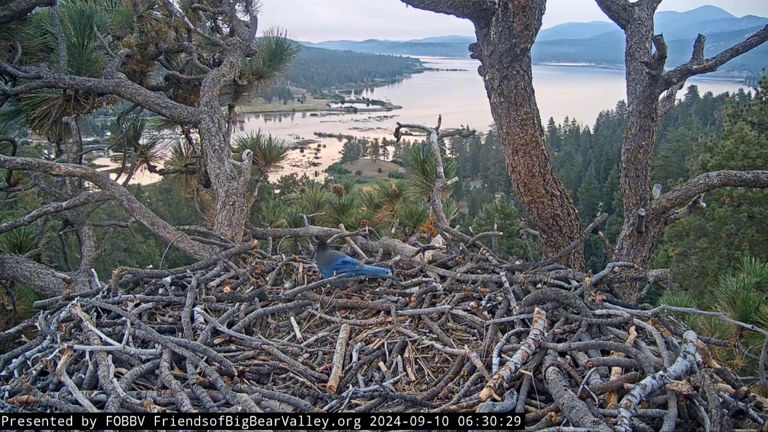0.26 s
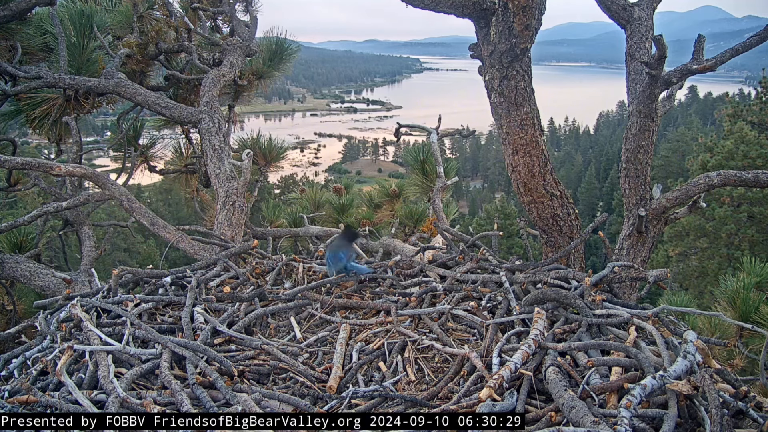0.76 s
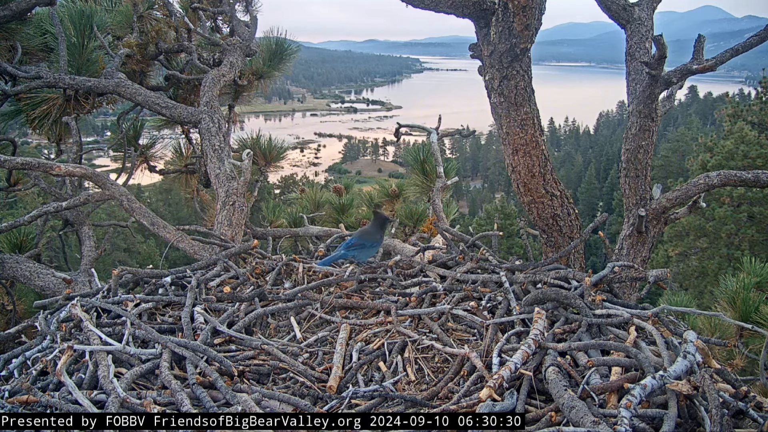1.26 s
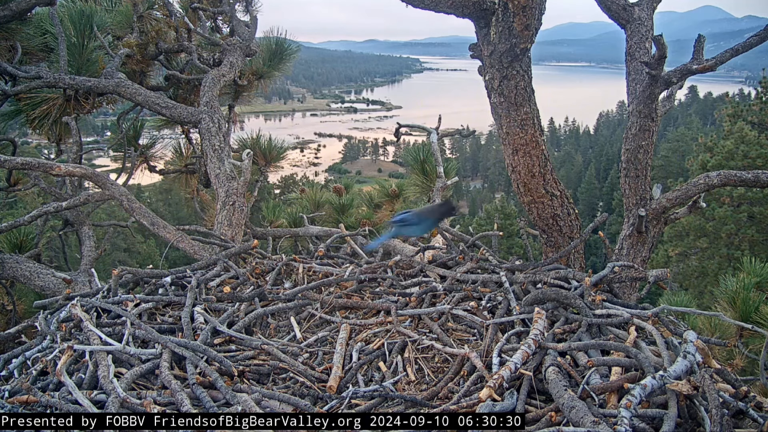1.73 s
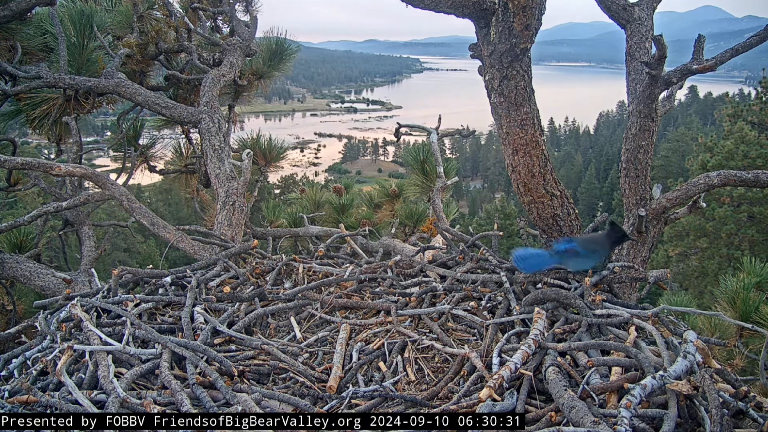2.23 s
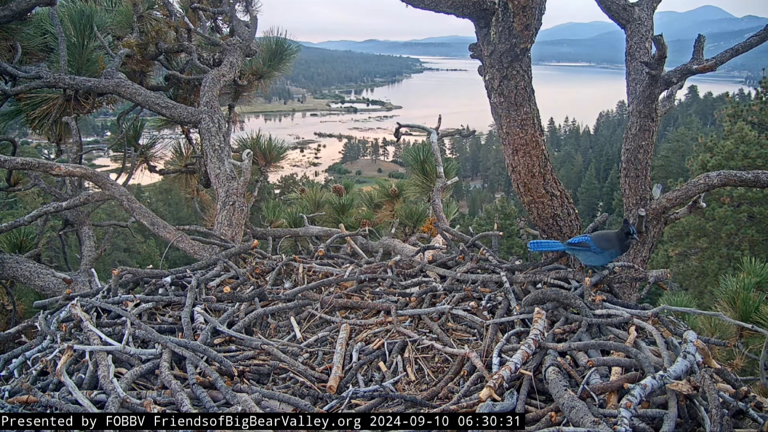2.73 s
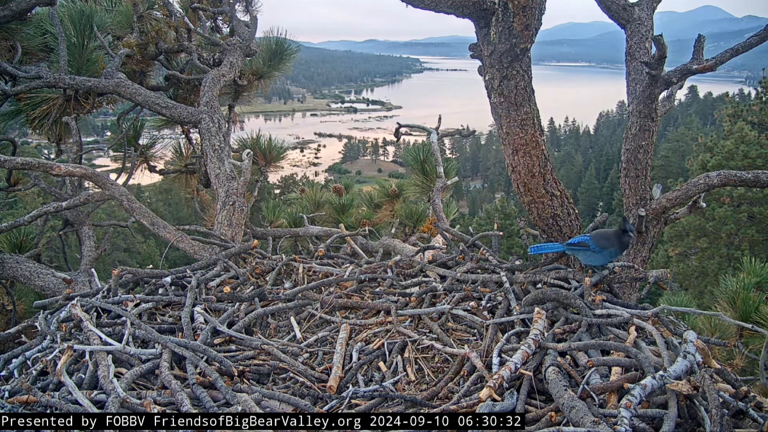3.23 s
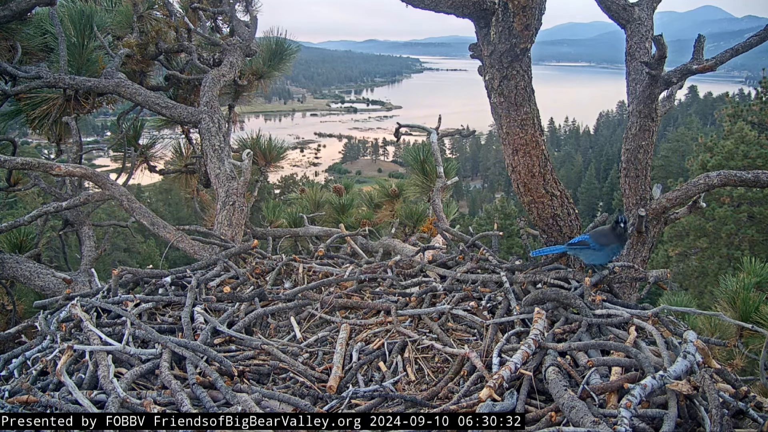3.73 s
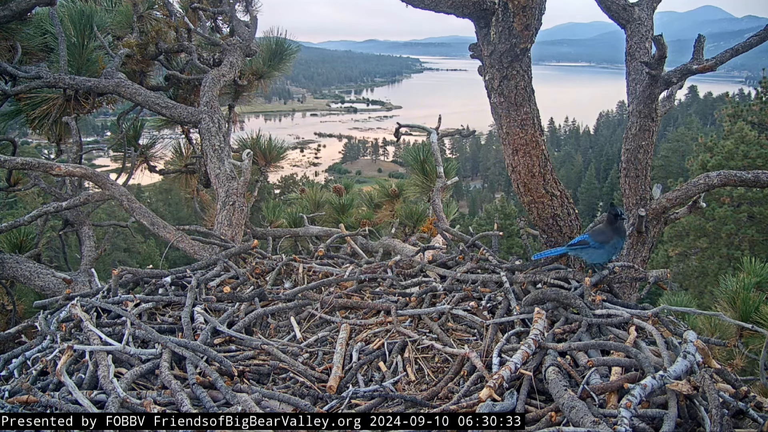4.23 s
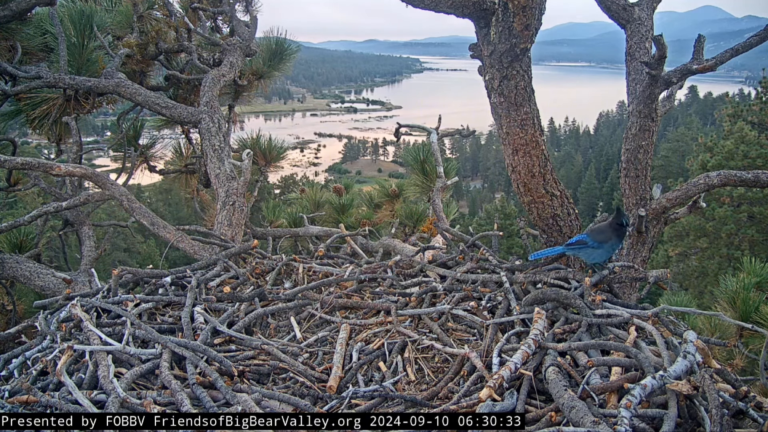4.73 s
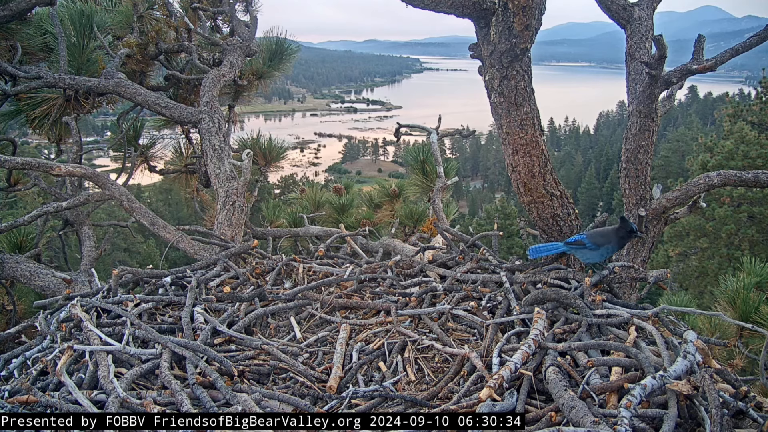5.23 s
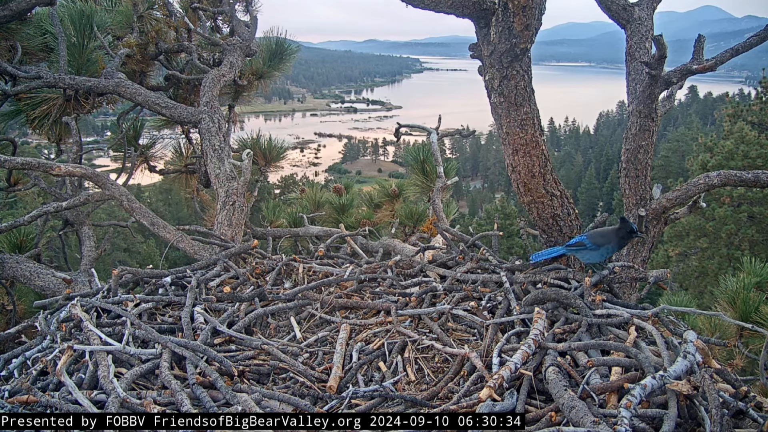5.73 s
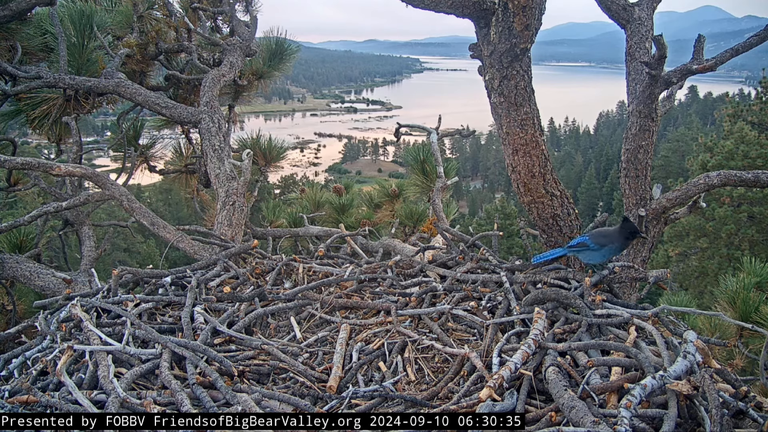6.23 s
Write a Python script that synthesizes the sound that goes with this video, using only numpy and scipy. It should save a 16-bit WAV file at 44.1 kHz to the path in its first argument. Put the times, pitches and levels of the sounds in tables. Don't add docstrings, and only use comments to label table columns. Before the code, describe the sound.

A close jay fires two rapid bursts of harsh, overdriven calls, a distant jay answering between them, over faint engine drone and small-bird chatter.

```python
import sys
import numpy as np
from scipy import signal
from scipy.fft import rfft, irfft, next_fast_len
from scipy.io import wavfile
from scipy.ndimage import uniform_filter1d, map_coordinates

SR = 44100
rng = np.random.default_rng(int(sys.argv[2]) if len(sys.argv) > 2 else 0)


def nominal_scale(level):
    x = np.asarray(level, float) / 20
    return 10 ** x


def wrap_up_sound(samples):
    columns = np.atleast_2d(samples).T
    tamed = np.clip(columns, -1, 1)
    steps = np.round(tamed * 32767).astype(np.int16)
    wavfile.write(sys.argv[1], SR, steps)


N = 286209
MS = np.arange(-441, 3300) / SR * 1000

# frequency in Hz, time to fall by 60 dB in seconds.
TREES = [(500, 1), (1900, 0.53), (4600, 0.58), (12000, 0.59)]
# frequency in Hz, level in dB.
FRONT = [(60, -20.5), (300, -7), (900, -15), (1500, -7), (3500, -1), (5300, 0), (9000, -3.5), (13500, -9.5),
         (14600, -10.5), (15700, -39.5)]


def unit(x):
    return x / np.sqrt(np.mean(x ** 2) + 1e-20)


def along(points, hz):
    f, v = np.transpose(points)
    return np.interp(np.log(hz + 1), np.log(f + 1), v)


def curves(rows):
    s, *cols = np.transpose(rows)
    return [np.interp(np.arange(N) / SR, s, c) for c in cols]


def wobble(rate, size=N):
    return map_coordinates(rng.standard_normal(size // 30 + 4), [np.arange(size) * rate / SR])


def coloured(x, spectrum):
    m = next_fast_len(len(x))
    points = [(0.64, -120)] + spectrum + [(SR / 2, -120)]
    gain = nominal_scale(along(points, np.fft.rfftfreq(m, 1 / SR)))
    return unit(irfft(rfft(x, m) * gain, m)[:len(x)])


def cycle(hz):
    return 2 * np.pi * (np.cumsum(hz) / SR + rng.random())


def echoes(x, t60s):
    # frequency in Hz, level in dB.
    echo_colour = [(500, -4), (1100, 1.5), (1850, 0.5), (2600, -3.5), (3700, 1), (4600, 3), (6000, -7.5),
                   (14000, 1.5)]
    hz, t, z = signal.stft(rng.standard_normal(SR // 2), SR, nperseg=128)
    fade_db = along(echo_colour, hz)[:, None] - 60 * t / along(t60s, hz)[:, None]
    tail = signal.istft(z * nominal_scale(fade_db), SR, nperseg=128)[1]
    return signal.fftconvolve(x, tail / np.linalg.norm(tail))


def hiss():
    # time in seconds, level in dB.
    hiss_level = [(0, -55.5), (1.3, -56), (1.7, -57.5), (2.8, -62), (4.9, -61.5), (5.9, -61.5),
                  (6.49, -62.5)]
    # frequency in Hz, density in dB per Hz.
    hiss_colour = [(400, 9.5), (850, 10.5), (1400, 6), (1950, 9.5), (2700, -3), (3700, 13), (4500, -1),
                   (6000, 12), (9000, 4), (13300, -2), (14000, 2), (14700, -42)]
    (hiss_db,) = curves(hiss_level)
    return nominal_scale(hiss_db) * coloured(rng.standard_normal(N), hiss_colour)


def engine():
    # time in seconds, level in dB, pitch the valley booms at in Hz, engine load in dB.
    drone = [(0.0, -33, 100, 0.5), (0.15, -34.5, 105, 3.5), (0.47, -34, 98, -8), (0.65, -38.5, 129, -6.5),
             (1.16, -35, 136, -9), (1.48, -39, 117, -9.5), (1.63, -39.5, 97.5, -13),
             (1.82, -46.5, 128, -8.5), (2.45, -46.5, 131, -5.5), (2.73, -41.5, 114, -10.5),
             (3.14, -42.5, 116.6, -7), (3.85, -38, 105, -19), (4.27, -40.5, 101, -6),
             (4.75, -43.5, 129, -4.5), (5.02, -47, 119, 1.5), (5.58, -49.5, 128, -5),
             (6.04, -35.5, 106, -6), (6.49, -33, 106.3, -8)]
    # time in seconds, firings a second in Hz, steadiness from 0 to 1.
    firing = [(0, 29, .98), (.4, 29.1, .96), (.65, 28.8, .86), (.9, 28.4, .84), (1.3, 27.9, .84),
              (1.7, 27.6, .8), (2.6, 26.5, .3), (3.7, 25, .25), (4.1, 25.4, .9), (4.5, 25.6, .97),
              (4.95, 26, .97), (5.8, 26.6, .97), (6.15, 27.05, .98), (6.49, 27.6, .98)]
    # level in dB, from order 2 to 24.
    order_levels = [0, 2, 2, 1, -5.5, 0, 1.5, 0, 1, -5, 3, 1.5, 1.5, 0.5, -4, 4, -3, -2, 3, -0.5, 3, 0, -2]
    # time in seconds, centre in Hz, depth in dB.
    ground = [(0, 199, -8), (.5, 200, -5), (1.5, 300, -2), (4.3, 290, -12), (4.6, 290, -9.5),
              (4.85, 253, -9), (5.8, 202, -7), (6.49, 195, -8)]
    # frequency in Hz, level in dB.
    pipe = [
        [(45, -75), (62, -44), (81, -15), (105, 0), (122, -3), (135, -30)],
        [(115, -40), (128, 0), (155, -3), (170, -30)],
        [(150, -40), (178, 3), (205, -4), (310, -5), (345, -20)],
        [(290, -30), (345, 0), (445, -1), (475, -19), (620, -22), (720, -38)],
    ]
    # share of the level, share of the load, offset in dB.
    load_rows = [
        (0.453, 0.558, -22),
        (0.999, 1.05, -1.5),
    ]
    blur = [1, 1, 4, 5]
    # frequency in Hz, level in dB.
    wash = [(440, -23), (500, 2), (630, -3.5), (720, -19), (850, -16.5)]

    hz, steady = curves(firing)
    turn = cycle(hz)
    dip_hz, dip_db = curves(ground)
    orders = np.zeros(N)
    for k, db in enumerate(order_levels, 2):
        octaves_off = np.log2(k * hz / dip_hz)
        ground_db = dip_db * np.exp(-(octaves_off / 0.16) ** 2)
        orders += nominal_scale(db + ground_db + 3 * wobble(2.2)) * np.sin(k * turn + 6.3 * rng.random())

    level_db, boom_hz, load_db = curves(drone)
    lows = [level_db - 37.5 * np.log2(boom_hz / centre_hz) ** 2 for centre_hz in (109, 137.7)]
    highs = [loud * level_db + share * load_db + db for loud, share, db in load_rows]
    out = nominal_scale(-68.5) * coloured(rng.standard_normal(N), [(20, -17.0), (50, -6.0), (70, 7.0), (90, -29.0)])
    for db, band, power in zip(lows + highs, pipe, blur):
        clear = steady ** power
        tones = np.sqrt(clear) * coloured(orders, band)
        rumble = np.sqrt(1 - clear) * coloured(rng.standard_normal(N), band)
        out += nominal_scale(db - 2.0) * (tones + rumble)
    return out + nominal_scale(highs[-1] - 17) * coloured(rng.standard_normal(N), wash)


def chatter():
    # time in seconds, level in dB.
    flock = [(0.0, -46), (0.38, -46), (0.65, -47.5), (1.16, -49), (1.3, -39), (1.5, -46), (1.75, -42),
             (2.3, -47.5), (2.96, -44.5), (3.31, -54), (3.78, -53.5), (3.98, -44.5), (4.5, -43),
             (4.78, -51.5), (5.0, -54.5), (5.2, -48), (5.75, -46.5), (6.49, -50.5)]
    # frequency in Hz, density in dB per Hz.
    voices = [
        [(900, -34.5), (1300, -18.5), (1550, -11), (1900, -2), (2400, -12.5), (3050, -13.5), (3700, -26),
         (4200, -48.5)],
        [(3300, -46), (3800, -5.5), (4400, 1.5), (5300, -2.5), (6000, -24), (7500, -37.5)],
    ]
    # time in seconds, length in seconds, lift of low voices in dB, of high in dB.
    syllables = [(.008, 0.024, 7, 5), (.16, 0.022, 6, 5), (0.232, 0.026, 3, 10.5), (0.335, 0.12, 7.5, 6.5),
                 (0.445, 0.044, 4, 2.5), (0.507, 0.016, -2, 4), (0.583, 0.027, 4.5, 6),
                 (0.65, 0.031, 3, 4.5), (0.844, 0.12, 1.5, 6.5), (1.037, 0.031, 6.5, -1),
                 (1.085, 0.044, 3, 4.5), (1.2, 0.076, 4.5, 6), (1.3, 0.028, -2, 5)]

    t = np.arange(N) / SR
    (low_db,) = curves(flock)
    high_db = low_db - 5 - 0.5 * t
    lift = sum(np.outer(pair, np.exp(-(2 * (t - s) / length) ** 4)) for s, length, *pair in syllables)
    shared = wobble(35)
    out = np.zeros(N)
    for db, spectrum in zip([low_db, high_db] + lift, voices):
        z = signal.stft(rng.standard_normal(N), nperseg=512)[2]
        field = uniform_filter1d(rng.standard_normal(z.shape), size=3, axis=0)
        field = uniform_filter1d(field, size=6, axis=1)
        patches = signal.istft(z * nominal_scale(3 * unit(field)), nperseg=512)[1][:N]
        out += nominal_scale(db + 1.2 * shared) * coloured(patches, spectrum)
    return out


def songbirds():
    # start in seconds, length in seconds, middle pitch in Hz, glide in Hz,
    # level in dB.
    arches = [(-.055, .13, 7000, -500, -56), (0.249, 0.12, 1758, 140, -39), (0.284, 0.07, 6160, -100, -57),
              (.26, .11, 5120, 150, -52), (0.385, 0.09, 6750, -700, -57), (3.5, 0.086, 1414, -150, -62.5),
              (3.78, 0.093, 2800, -280, -60), (3.78, 0.062, 1383, -74, -60)]
    glides = [(0.152, 0.023, 2000, 79, -37), (0.14, 0.029, 4360, 199, -50),
              (1.19, 0.047, 5500, -300, -52.5), (0.262, 0.063, 3480, 158, -48.5),
              (0.295, 0.081, 2830, -200, -52), (0.335, 0.054, 1730, 345, -39), (.53, 0.075, 5260, -40, -53),
              (0.685, 0.043, 996, -66, -59), (0.824, 0.11, 1765, 72, -45), (0.855, 0.058, 2620, -710, -54),
              (1.027, 0.024, 1800, -170, -38.5), (1.071, 0.0086, 2300, -600, -51),
              (1.09, .009, 2200, -700, -49), (.005, 0.011, 2300, -1000, -47), (.226, .02, 2050, 0, -45),
              (1.215, .06, 3000, 498, -58), (1.184, 0.049, 1767, -150, -40.5),
              (1.24, 0.032, 1850, -500, -43.5), (1.286, 0.055, 1640, 57, -42),
              (1.287, 0.14, 2800, -100, -44.5), (3.52, 0.038, 2810, -300, -58.5),
              (3.53, 0.042, 1900, -400, -53), (3.82, 0.04, 2950, -350, -60), (5.88, 0.28, 3000, -30, -60),
              (6.015, 0.02, 5280, -500, -51.5), (6.017, 0.018, 4330, -500, -51),
              (3.767, 0.11, 1750, -150, -56.5), (5.102, 0.0072, 1830, 27, -31),
              (5.243, 0.0055, 1820, -2, -37), (5.383, .006, 1800, 0, -32), (2.141, 0.004, 1820, -2, -39),
              (5.854, 0.015, 944, -20, -57)]
    dips = [
        (4.23, 0.16, 1588, 77, -45),
        (4.305, 0.057, 2687, 140, -48),
    ]

    out = np.zeros(N + SR)
    early = SR // 10
    for rows, bend in [(arches, -0.13), (glides, -0.0458), (dips, 0.0624)]:
        for s, length, middle, glide, db in rows:
            u = np.linspace(-1, 1, round(length * SR))
            hz = middle * (1 + bend * u ** 2) + glide / 2 * u
            hz = hz * (1 + 0.016 * wobble(190, len(u)))
            swell_db = 5 + 5.5 * np.tanh(wobble(64.8, len(u)))
            note = nominal_scale(db + swell_db) * (1 - u ** 4) * np.sin(cycle(hz))
            out[round(s * SR) + early:][:len(u)] += note
    out = out[early:][:N]
    return out + nominal_scale(-11) * echoes(out, TREES)[:N]


def claws():
    # start in seconds, peak in dB, pitch of the stick in Hz.
    knocks = [
        (3.004, -27.5, 272),
        (3.038, -24, 260),
        (3.7, -39.5, 400),
    ]
    # start in seconds, peak in dB.
    ticks = [
        (1.054, -45),
        (4.0462, -51),
        (4.8299, -52),
        (6.0292, -58),
    ]

    out = np.zeros(N + SR)
    t = np.arange(SR // 20) / SR
    for s, db, hz in knocks:
        sinking_hz = hz * (1 + 0.77 * np.exp(-t / 0.0055))
        swell = nominal_scale(db - 60 * t / 0.045) * (1 - np.exp(-t / 0.0018))
        out[round(s * SR):][:len(t)] += swell * np.sin(2 * np.pi * np.cumsum(sinking_hz) / SR)
    for s, db in ticks:
        crackle = np.convolve(rng.standard_normal(len(t)), [.25, .25, -.25, -.25], "same")
        out[round(s * SR):][:len(t)] += nominal_scale(db + 9 - 60 * t / .003) * crackle
    return out[:N]


def shape(full, until, rise, fall, db):
    return db - rise * np.clip(full - MS, 0, None) - fall * np.clip(MS - until, 0, None)


def shake(rate):
    return np.tanh(wobble(rate, len(MS)))


def syrinx_whistle(pitch, drive_db, whistle_db, rough, unsteady, slide, start_hz, slack_hz, catch_db):
    held_hz = 1820
    drop = (start_hz - held_hz) * (1 - np.tanh((MS + 0.4) / 1.1 / 2)) / 2
    held = np.maximum(slack_hz, held_hz + drop - 28 * np.clip(MS - 28, 0, None))
    after = np.clip(MS - 3, 0, None)
    ring = -0.036 * np.sin(2 * np.pi * after / 11.34) * np.exp(-after / 16)
    flutter = unsteady * (.04 * shake(300) + .06 * shake(900))
    turn = cycle(pitch * held * (1 + ring - slide * np.clip(MS - 14, -14, 14) + flutter))
    third = nominal_scale(-19 + 8 * shake(500)) * np.clip(MS / 15, 0, 1) * np.sin(3 * turn)
    flutter_db = rough * (2.2 * shake(260) + 4.5 * shake(800))
    flutter_db += catch_db * np.exp(-((MS - 6.6) / 1.3) ** 2 / 2)
    overshoot = nominal_scale(shape(0.8, 4, 18, 2.2, 6) + min(drive_db + 9.5, 0))
    body = nominal_scale(shape(0.6, 35, 16, 6, -0.5)) + overshoot
    return body * nominal_scale(whistle_db + flutter_db) * (np.sin(turn) + third)


def thin_voice(arc_db):
    hz = 3053 - (3053 - 1600) * np.exp(-(MS + 9.5) / 1.6) - 169 * np.clip(MS + 4.5, 0, 4)
    tone = np.sin(cycle(hz * (1 + 0.042 * shake(340))))
    return nominal_scale(shape(-7, 4, 9, 5.5, -20) + arc_db + 3 * shake(400)) * tone


def syrinx_rasp(low_db, high_db, lead_db, unsteady, scoop, lead_hz, early_ms):
    # lead-in in dB, loudest at ms, loudest level in dB, rise in dB per ms, fall in dB per ms.
    partials = [
        (-3.5, 33, -12, 0.5, 1.5),
        (-28, 21.3, -4, 0.73, 0.86),
        (-21, 37.5, -1.5, 0.9, 1.5),
        (-33, 14, -23, 0.5, 0),
    ]

    hz = shape(16, 16, 5.5, 4.5, 1620) - 13.9 * np.clip(MS - 38, 0, 25)
    after = np.clip(MS - 3, 0, None)
    hz = hz * (1 - scoop * np.exp(-(after / 7) ** 2 / 2))
    hz = np.where(MS < 2, lead_hz - 18 * (MS + 3), hz)
    opening_db = shape(13.5, 47.5, 0.75, 1.5, -0.5)
    lift_db = [0, low_db, high_db, high_db]
    out = np.zeros(len(MS))
    for k, (first_db, ms, db, rise, fall) in enumerate(partials):
        lead_in = nominal_scale(first_db + lead_db + shape(-5, -1.2, 9, 9, 1.5))
        full_ms = ms - early_ms * (ms > 30)
        body = nominal_scale(shape(full_ms, ms, rise, fall, db) + opening_db)
        level = (lead_in + body) * nominal_scale(lift_db[k] + 3.2 * unsteady * shake(800))
        out += level * np.sin(cycle((k + 1) * hz * (1 + .036 * unsteady * shake(700))))
    return out


def breath_noise(breath_db):
    # frequency in Hz, level in dB.
    throat = [(300, -52), (600, -17), (1100, -19.5), (1700, 7), (2400, 9), (3100, 7), (3800, 2), (4600, 8),
              (6000, -0.5), (9000, -22), (14000, -40)]
    level_db = shape(18.5, 40.5, 0.96, 2, -8.5) + breath_db - 4.3 * np.clip(-3 - MS, 0, None)
    return nominal_scale(level_db) * coloured(rng.standard_normal(len(MS)), throat)


def closing(pitch, whistle_db, rough, upper, under_db, close_db):
    hz = pitch * np.clip(2000 - 36.02 * (MS - 38.5), 900, 3000)
    fall = cycle(hz * (1 + 0.0401 * rough * shake(500)))
    brief = nominal_scale(shape(0, 39, 0, 2.5, 0))
    tones = np.sin(fall) + upper * brief * np.sin(1.3 * fall) + .12 * np.sin(3 * fall)
    close = nominal_scale(shape(38.5, 46, 2, 6, -2) + whistle_db + close_db + 3 * shake(330)) * tones

    linger = np.sin(cycle(pitch * 1830 * (1 + 0.086 * shake(451))))
    linger *= nominal_scale(shape(47.5, 52.5, 4, 3.5, -17.5) + whistle_db + 5.4 * shake(350))

    sink_hz = np.clip(1499 - 30.3 * (MS - 46), 1132, 1500)
    sink = np.sin(cycle(sink_hz * (1 + 0.033 * shake(340))))
    sink *= nominal_scale(shape(46, 57, 0.5, 6, -15) + 2 * shake(200))

    under_hz = 600 + 430 * np.exp(-(np.clip(MS - 30, 0, None) / 10) ** 2 / 2)
    under = np.sin(cycle(under_hz * (1 + 0.035 * shake(200))))
    under *= nominal_scale(shape(50, 64, 1, 3.5, -24) + under_db + 2 * shake(150))
    return close + linger + sink + under


def call(pitch, low_db, high_db, drive_db, whistle_db, lead_db, breath_db, arc_db, manner):
    # roughness, scoop of the rasp as a share of pitch,
    # slide of the whistle per ms, share of the upper voice in the close, undertone in dB.
    manners = dict(near=(1.2, .1, .003, .35, -2), again=(1, 0, .001, .3, -7),
               turning=(1.15, .18, .002, .4, 5), away=(.95, .05, .002, .5, -10),
               far=(1.1, 0, .004, 1.2, -12))
    # start in Hz, lead-in in Hz, slack pitch in Hz,
    # how early the high rasp comes in ms, close in dB, catch of the air after the snap in dB.
    habits = dict(near=(2500, 1500, 1499.5, 0.5, 0, -2), again=(2350.5, 1500, 1520, 0, -0.5, -2.5),
              turning=(2079, 1700.5, 1650, 3, 1.5, -7.5), away=(2000.5, 1700.5, 1600, 2.5, 0.5, -5),
              far=(2298.5, 1650, 1550, 13.5, -0.5, -3))
    rough, scoop, slide, upper, under_db = manners[manner]
    start_hz, lead_hz, slack_hz, early_ms, close_db, catch_db = habits[manner]
    unsteady = rough * np.clip(MS / 20, .45, 1)
    whistle = syrinx_whistle(pitch, drive_db, whistle_db, rough, unsteady, slide, start_hz, slack_hz, catch_db)
    rasp = syrinx_rasp(low_db, high_db, lead_db, unsteady, scoop, lead_hz, early_ms)
    close = closing(pitch, whistle_db, rough, upper, under_db, close_db)
    return whistle + thin_voice(arc_db) + rasp + breath_noise(breath_db) + close


def beam(x, spectrum):
    m = next_fast_len(len(x) + 2000)
    f = np.fft.rfftfreq(m, 1 / SR)
    lag = (3500 ** 2 - f ** 2 - 1j * f * 3000) / (3500 ** 2 - f ** 2 + 1j * f * 3000)
    gain = nominal_scale(along([(0.6, -120)] + spectrum + [(SR / 2, -120)], f))
    return irfft(rfft(x, m) * lag * gain, m)[:len(x)]


def jay(calls, snap_db, drive_db, whistle_db, lead_db, breath_db, arc_db, manner, facing, gain_db, nest_db,
        trees_db):
    # frequency in Hz, time to fall by 60 dB in seconds.
    nest = [(500, 0.04), (1900, 0.085), (4600, 0.069), (12000, 0.13)]
    out = np.zeros(N + 2 * SR)
    snap = nominal_scale(snap_db * np.exp(-np.abs(MS - 0.9) / np.where(MS < 0.9, 1.5, 3)))
    for s, db, *voice in calls:
        blown = nominal_scale(drive_db) * call(*voice, drive_db, whistle_db, lead_db, breath_db, arc_db, manner)
        squared = blown / (1 + np.abs(blown) ** 6) ** (1 / 6)
        throb = nominal_scale(1.2 * shake(258) + 2.6 * shake(1300))
        direct = beam(snap * throb * squared, facing)
        answer = nominal_scale(nest_db) * echoes(direct, nest) + nominal_scale(trees_db) * echoes(direct, TREES)
        heard = np.pad(answer, (300, 0))
        heard[:len(direct)] += direct
        out[round(s * SR) - 441:][:len(heard)] += nominal_scale(db + gain_db) * heard
    return out[:N]


def far_jay():
    # snap in seconds, peak in dB, pitch factor, low rasp in dB, high rasp in dB.
    far_calls = [
        (2.7473, -25, 0.94, 1.5, -4),
        (2.8882, -25.5, 0.94, 2.5, -3.5),
        (3.8676, -28, 0.96, 8.5, 0),
        (4.002, -28, 0.97, 6, -4.5),
        (4.1388, -28.5, 0.95, 4, -7),
        (4.2764, -28.5, 1, 2.5, -7.5),
        (4.4188, -29.5, 0.96, 0.5, -5.5),
        (4.5648, -29, 0.96, 1, -9),
    ]
    # frequency in Hz, level in dB.
    behind = [(900, -33), (1400, -15.5), (1900, -4), (2600, -5), (3200, -6.5), (3800, -5), (4700, -1.5),
              (5600, -14), (8000, -28), (12000, -55)]
    far = jay(far_calls, snap_db=-1.5, drive_db=-12, whistle_db=1, lead_db=3, breath_db=-9, arc_db=-2,
              manner="far", facing=behind, gain_db=12, nest_db=-7.5, trees_db=-13)
    return far + nominal_scale(-15) * np.roll(far, round(.072 * SR))


def jay_turned_away():
    # snap in seconds, peak in dB, pitch factor, low rasp in dB, high rasp in dB.
    away_calls = [
        (1.353, -5.5, 1.001, 1.5, -1.5),
        (1.4905, -6, 1.02, -0.5, -2.5),
    ]
    # frequency in Hz, level in dB.
    aside = [(900, -20), (1400, -10.5), (1900, -4.5), (2500, -8), (3200, -1.5), (3850, -4), (4700, 9),
             (5600, -11), (6500, -6.5), (8000, -11), (12000, -47)]
    return jay(away_calls, snap_db=2.0, drive_db=-15.5, whistle_db=-0.5, lead_db=0.5, breath_db=-2.0, arc_db=-9,
               manner="away", facing=aside, gain_db=9.5, nest_db=-10.0, trees_db=-25.5)


def jay_turning():
    # snap in seconds, peak in dB, pitch factor, low rasp in dB, high rasp in dB.
    turning_calls = [
        (1.6122, 2, 1.05, 2, -4),
        (1.7486, 0.5, 1.02, 0, -2),
        (1.8871, 1.5, 1.04, 9.5, -3),
    ]
    return jay(turning_calls, snap_db=4.0, drive_db=-5.5, whistle_db=1.5, lead_db=-1, breath_db=2.0, arc_db=-3.5,
               manner="turning", facing=FRONT, gain_db=-3.0, nest_db=-11, trees_db=-29.0)


def jay_facing():
    # snap in seconds, peak in dB, pitch factor, low rasp in dB, high rasp in dB.
    near_calls = [
        (2.0266, 0, 1.02, 0.5, -3),
        (2.161, 0.5, 1.008, 6, -10),
        (2.3006, 0.5, 1.015, -6.5, -0.5),
        (2.4392, 1, 1.01, -11, 3),
        (2.5828, 1, 0.99, -2, 3),
    ]
    return jay(near_calls, snap_db=3.0, drive_db=1.5, whistle_db=6.5, lead_db=-5.0, breath_db=4.0, arc_db=1.0,
               manner="near", facing=FRONT, gain_db=-5.0, nest_db=-13.5, trees_db=-24.5)


def jay_again():
    # snap in seconds, peak in dB, pitch factor, low rasp in dB, high rasp in dB.
    again_calls = [
        (4.9804, 1, 0.99, -16, 2.5),
        (5.1214, 0, 0.95, -13, 2.5),
        (5.2614, 0.5, 0.98, -8, 2),
        (5.4019, 1, 0.99, -14, 4),
        (5.5479, 1, 1.01, -8, 2),
        (5.696, 0.5, 1.005, -10.5, 3.5),
    ]
    return jay(again_calls, snap_db=5.0, drive_db=4, whistle_db=6.5, lead_db=-4.0, breath_db=5.5, arc_db=-3.5,
               manner="again", facing=FRONT, gain_db=-5.5, nest_db=-14, trees_db=-26.0)


def scene():
    background = hiss() + engine() + chatter() + songbirds() + claws()
    near = jay_turned_away() + jay_turning() + jay_facing() + jay_again()
    return (background + far_jay() + near)[None]


def low_pass(x):
    return signal.sosfilt(signal.butter(12, 15750, fs=SR, output="sos"), x)


def record(dry):
    rounded = dry / (1 + np.abs(dry) ** 8) ** (1 / 8)
    return low_pass(np.clip(1.053 * rounded, -1, 1))


dry = scene()
out = record(dry)
wrap_up_sound(out)
```